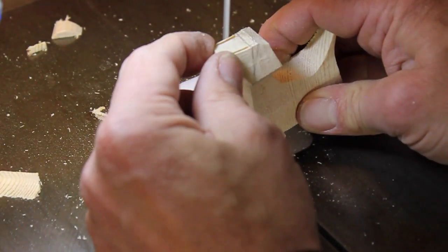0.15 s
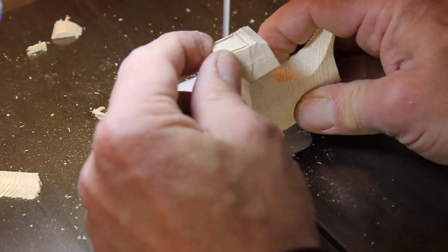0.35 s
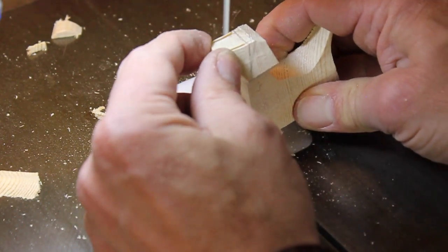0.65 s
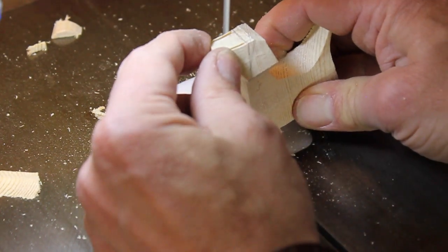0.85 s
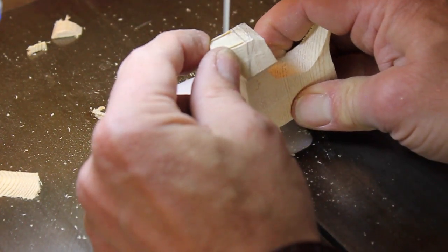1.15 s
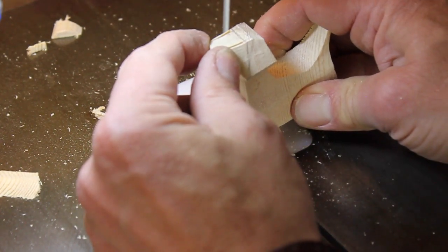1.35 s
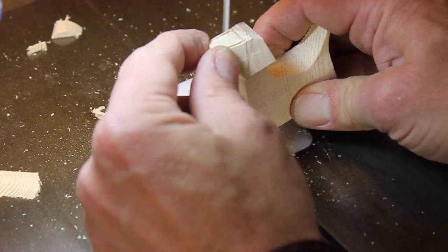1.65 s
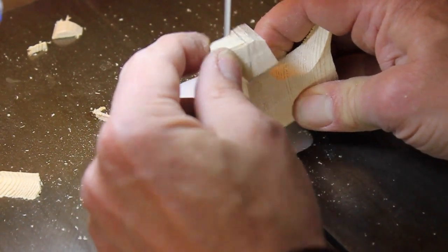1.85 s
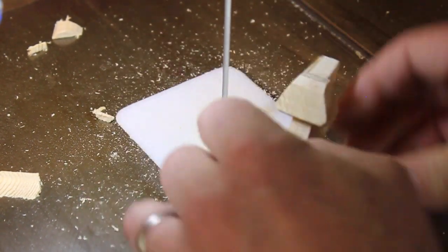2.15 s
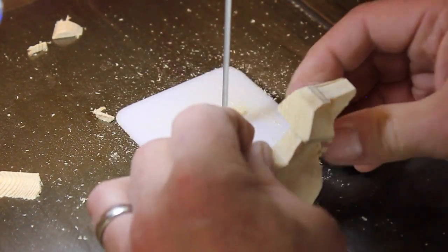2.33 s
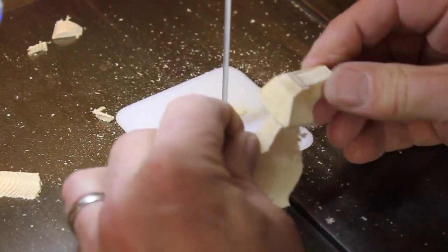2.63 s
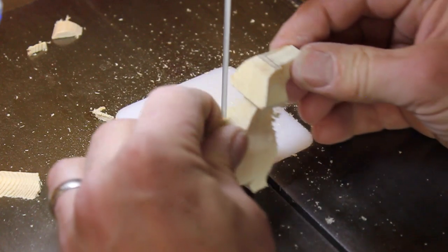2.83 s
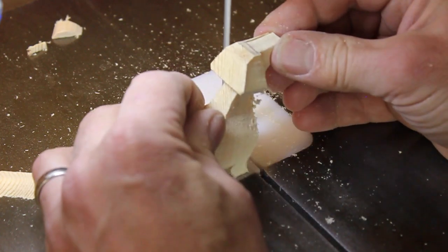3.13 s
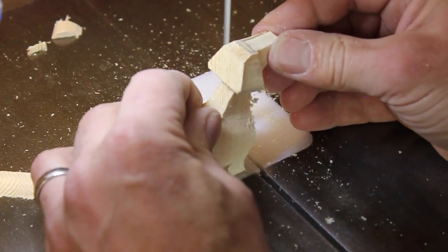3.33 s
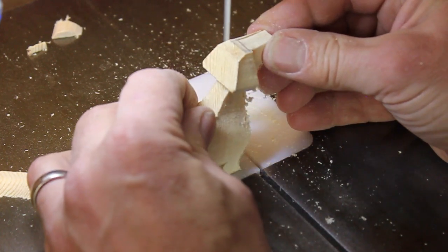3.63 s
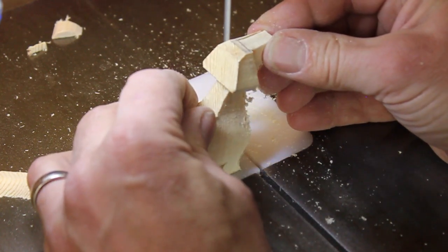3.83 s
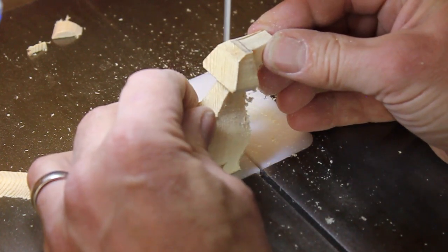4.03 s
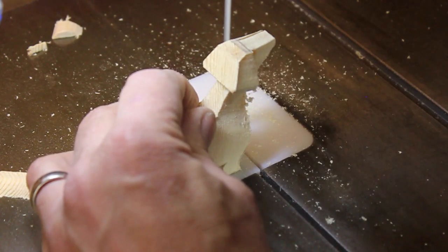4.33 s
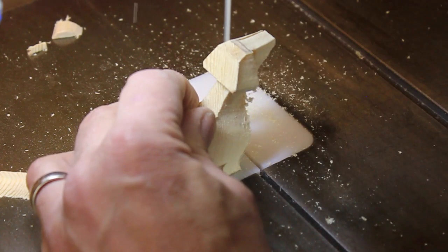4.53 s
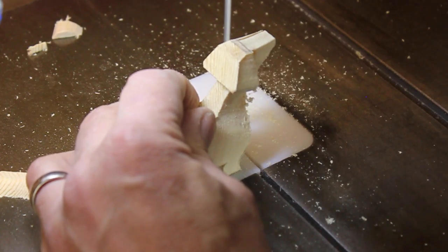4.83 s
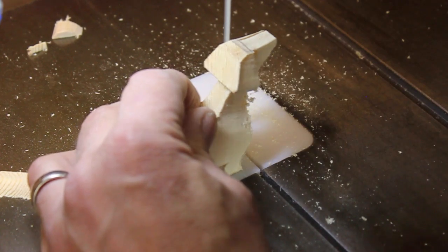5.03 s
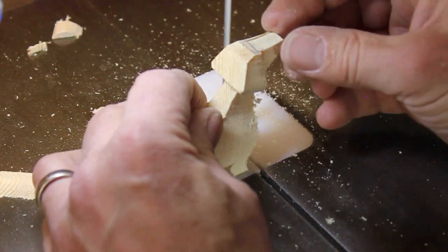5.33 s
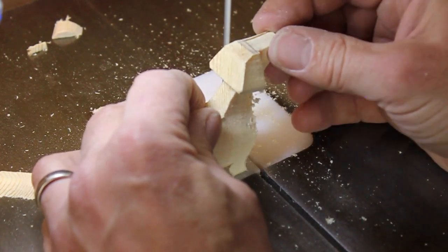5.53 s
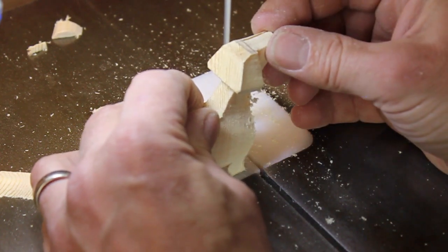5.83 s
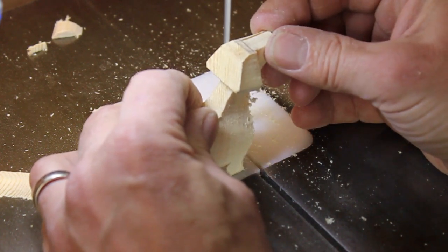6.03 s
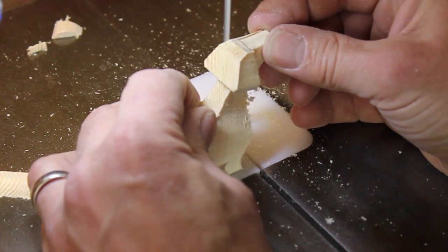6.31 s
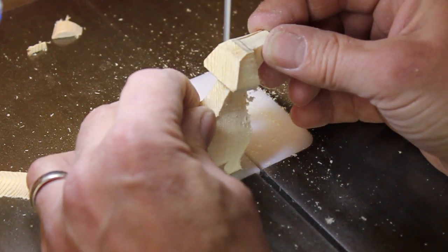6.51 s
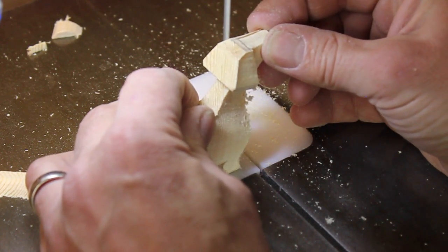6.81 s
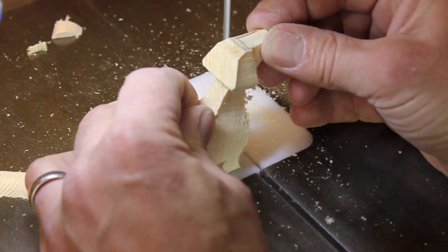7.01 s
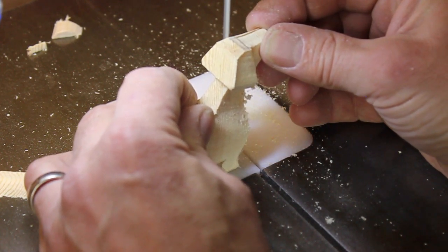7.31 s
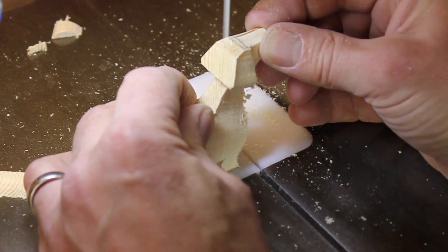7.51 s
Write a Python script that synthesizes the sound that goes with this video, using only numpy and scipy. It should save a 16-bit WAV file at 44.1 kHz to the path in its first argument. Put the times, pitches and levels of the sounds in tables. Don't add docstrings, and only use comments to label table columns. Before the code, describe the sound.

Steady bandsaw drone with harsh, throbbing blade hiss and a thin tooth whine; a small pop, then the same machine louder.

```python
import sys
import numpy as np
from scipy import signal
from scipy.fft import rfft, irfft
from scipy.io import wavfile
from scipy.ndimage import uniform_filter1d

SR = 44100
rng = np.random.default_rng(int(sys.argv[2]) if len(sys.argv) > 2 else 0)


def log_audio(samples):
    frames = np.atleast_2d(samples).T
    limited = np.clip(frames, -1, 1)
    pcm = np.round(limited * 32767).astype(np.int16)
    wavfile.write(sys.argv[1], SR, pcm)


def invert_db(level):
    return 10 ** (np.asarray(level, dtype=float) / 20)


N = 337806

CUT_S, SKIP_S = 2.2841, 0.0165
HUM_HZ, FAN_HZ = 100.16, 348.63
FAN_PER_PRESSURE, FAN_PER_LAP = 0.61, 0.37
LAP_HZ = 3.635
SING_S, SPEED_JITTER_HZ = 0.024, 3.5
BODY_PER_PRESSURE, SIZZLE_PER_PRESSURE = -0.27, -0.26
RUMBLE_HZ, RUMBLE_GRIP_DB = 380, -3.5
POP_DB, POP_S = -26, 0.0008

# fan level/dB, hum level/dB
MOTOR_DB = [
    (-27, -48),
    (-25, -46.5),
]
# f/Hz, swing/dB, lead/turns
SLIP_BEAT = [
    (1.1, 2.5, 0.56),
    (.56, 2.5, .59),
]
# f/Hz, level/dB
FIRST_ORDERS = [(471, -51.5), (702, -47.5)]
SECOND_ORDERS = [(50, -83), (149.5, -62.5), (400.6, -66), (451, -51.5), (500.6, -49), (701, -44.5),
                 (744, -58)]
# multiple of lap rate, swing/dB, lead/turns
LAP_THROB = [
    [(2, 0.77, 0.79), (4, 0.52, .36)],
    [(.5, 0.29, 0.47), (1, 0.77, 0.95), (2, 0.54, 0.81)],
]
# t/s, pressure level/dB, grip/0-1
CONTACT = [
    [(0, 0.4, 0.5), (.45, -0.3, 0.93), (1.0, 0.7, 0.7), (1.3, -1, 0.87), (1.7, 1, .8), (2.05, 0.5, 0.1),
     (2.28, 1, 0)],
    [(2.29, 0.3, 0), (2.6, 1, 0), (2.95, -.8, 0), (3.2, 0.8, 0), (4.3, -0.3, 0.1), (4.75, 0.3, 0),
     (5.05, -0.65, .05), (6.0, -0.2, 0), (6.5, 0.3, .1), (7.0, -1.2, 0.38), (7.66, -2.3, 0.8)],
]
# t/s, f/Hz
TOOTH_RATE = [
    (0, 870.5),
    (.5, 868.5),
    (1.7, 867.5),
    (2.0, 872),
    (2.4, 872.3),
    (6.9, 872),
    (7.66, 871),
]
# f/Hz, swing/Hz of tooth rate
RUNOUT = [
    [(10.6, 2.0), (21.3, 1.3), (14.5, .9)],
    [(5.34, 2.0), (8.27, 1.4), (10.7, 1.1)],
]
# multiple, level/dB, pressure share, full-grip change/dB, lap share
TOOTH_OVERTONES = [
    [(1, -32.5, 0.98, -1.5, 1.1), (2, -39.5, 0.61, 2.5, 1.1), (3, -29.5, 0.48, 1.3, 1.1),
     (4, -33.5, .8, -3.5, 1.1), (5, -37.5, .8, -2, 1.1), (6, -32.5, .8, -8, 1.1)],
    [(1, -32, 0.52, -2.5, 0.86), (2, -40.5, .8, 5.5, 2.3), (3, -28, 0.49, 5.5, 0.43),
     (4, -32.5, 0.73, 3.5, 0.81), (6, -35, .8, 2, 1.2)],
]
# t/s, overtones 1-2 level/dB, higher overtones level/dB
SINGS = [(.23, 2, 3), (.93, .5, -2), (1.22, 4, 4), (1.48, 3, .5), (1.8, 1, 1.5), (2.6, 3.5, 1.5),
         (2.82, -1, 5.5), (3.17, 0, 3.5), (3.37, -2, 6), (3.7, 2, 4), (3.92, 1.5, 4), (4.26, 3, -2),
         (4.47, -1, 6), (4.71, 1, 7.5), (4.8, 4, 4), (5.26, 4, 7), (5.81, -1, 6), (5.91, 2.5, 1),
         (6.18, 3.5, 6), (6.38, -4, 5), (6.73, -1, -2), (6.94, -1, 7), (7.27, -6, 3.5), (7.5, .5, 4.5)]
# f/Hz, level/dB
HISS_COLOUR = [
    [(25, -30), (185, -19.5), (203, -9.5), (420, -6), (720, -5.5), (1300, -6.5), (1900, -6.5), (2350, -3), (5700, -0.46), (6200, -4), (7050, -2), (7400, -5.5), (11300, -8), (15700, -11.5)],
    [(25, -24), (185, -16.5), (203, -3.5), (420, -0.5), (720, -6), (1300, -3.5), (1900, -4), (2350, 0.5), (5700, 3.5), (6200, -0.5), (7050, 0.5), (7400, -2), (11300, -6.5), (15700, -9.5)],
]
# f/Hz, width/Hz, first shot
# level/dB, second shot level/dB
PEAKS_AND_DIPS = [(480, 30, 4.2, 4.4), (940, 50, 3.2, 9.1), (1060, 90, 6.5, 2.8), (1510, 40, 7.6, 2.5),
                  (1650, 100, 8.8, 3.6), (2100, 60, 4.5, 8.4), (2230, 50, 6.4, 6.3), (2700, 300, 6.3, 6.2),
                  (2870, 40, 3.9, 5.0), (3425, 30, 5.0, 7.8), (3570, 50, 7.6, 5.4), (3820, 270, 1.2, 2.6),
                  (4260, 30, 5.8, 3.7), (4810, 90, 2.0, 3.7), (5880, 80, 4.0, 2.5), (5970, 40, 4.3, 5.6),
                  (6550, 290, 3.7, 4.1), (7070, 60, 5.1, 1.9), (7840, 90, 6.8, 3.2), (8180, 40, 6.2, 2.9),
                  (9690, 110, 5.1, 7.8), (9870, 50, 5.5, 4.7), (10800, 110, 7.5, 7.6), (12050, 300, 6.0, 6.5),
                  (12190, 50, 5.8, 0.8), (13040, 180, 6.2, 2.5), (13920, 140, 9.5, 8.9), (14350, 100, 6.5, 7.5),
                  (14510, 110, 6.2, 6.4), (15610, 100, 3.2, 3.3),
                  (1400, 60, -5, -4),
    (1900, 130, -3.5, -5),
    (7330, 100, -4, -3),
    (11300, 200, -1.5, -3),
]
# rub level/dB, then full-grip change/dB of rub, body, sizzle
RUB_DB = [
    (-26, -1.8, 6, 3.5),
    (-21.5, 0.9, 4, 2.5),
]
USUAL_GRIP = .7, .15
# t/s, low f/Hz, high f/Hz
SPLIT_BANDS = [(0.618, 14470, 15930), (0.732, 12320, 13870), (0.85, 4570, 6980), (0.859, 13090, 15850),
               (1.059, 5080, 6370), (1.128, 4570, 5770), (2.13, 14380, 15850), (2.154, 9650, 11110),
               (2.171, 6800, 8350), (2.523, 4570, 5770), (2.523, 11020, 12490), (3.127, 8180, 9730),
               (3.403, 14470, 15850), (3.752, 4130, 5250), (3.844, 9560, 13870), (4.262, 4130, 5250),
               (4.288, 8180, 9730), (4.381, 10250, 11800), (4.774, 9560, 11110), (4.889, 4130, 5250),
               (5.309, 11020, 12490), (6.389, 11630, 15850), (6.447, 8870, 10420), (6.448, 5600, 6980),
               (6.537, 12320, 13780), (6.632, 4130, 5250), (7.119, 8870, 10340), (7.119, 13700, 15930),
               (7.238, 6890, 8350), (7.605, 4570, 5770)]


def evened(x):
    return x / np.sqrt(np.mean(abs(x) ** 2) + 1e-20)


def columns(rows):
    s, *values = np.transpose(rows)
    return [np.interp(np.arange(N) / SR, s, v) for v in values]


def wander(hz):
    f = np.fft.fftfreq(N, 1 / SR)
    z = rng.standard_normal(N) + 1j * rng.standard_normal(N)
    return evened(np.fft.ifft(z / (1 + (f / hz) ** 2)))


def lap(shot):
    t = np.arange(N) / SR - CUT_S
    return sum(db * np.cos(2 * np.pi * (k * LAP_HZ * t + lead)) for k, db, lead in LAP_THROB[shot])


def motor(shot):
    t = np.arange(N) / SR - CUT_S + (shot - 0.5) * SKIP_S
    press_db, _ = columns(CONTACT[shot])
    fan_db, hum_db = MOTOR_DB[shot]
    fan_db = fan_db + FAN_PER_PRESSURE * press_db + FAN_PER_LAP * lap(shot)
    beat_hz, swing_db, lead = SLIP_BEAT[shot]
    hum_db = hum_db + swing_db * np.cos(2 * np.pi * (beat_hz * t + lead))

    unsteady = 1 + 0.07 * wander(14) + 0.06 * wander(5)
    out = -invert_db(fan_db) * (np.exp(2j * np.pi * FAN_HZ * t) * unsteady).real
    out += invert_db(hum_db) * np.cos(2 * np.pi * HUM_HZ * t)
    for hz, db in (FIRST_ORDERS, SECOND_ORDERS)[shot]:
        waver = evened(1 + 1.2 * wander(6))
        out += invert_db(db) * (np.exp(2j * np.pi * hz * t) * waver).real
    return np.sqrt(2) * out


def teeth(shot):
    t = np.arange(N) / SR
    press_db, grip = columns(CONTACT[shot])
    low_db, high_db = sum(np.outer(dbs, np.exp(-((t - s) / SING_S) ** 2)) for s, *dbs in SINGS)

    rate_hz = columns(TOOTH_RATE)[0] + SPEED_JITTER_HZ * wander(20).real
    for f, swing_hz in RUNOUT[shot]:
        rate_hz = rate_hz + swing_hz * np.sin(2 * np.pi * (f * t + rng.random()))
    turns = np.cumsum(rate_hz) / SR

    out = np.zeros(N)
    for k, db, push, grip_db, throb in TOOTH_OVERTONES[shot]:
        sing_db = low_db if k < 3 else high_db
        level_db = db + push * press_db + grip_db * grip + throb * lap(shot) + sing_db
        smear = evened(1 + (0.3 + 0.07 * k) * wander(22))
        out += np.sqrt(2) * invert_db(level_db) * (np.exp(2j * np.pi * k * turns) * smear).real
    return out


def hiss_colour_db(shot, hz):
    f, db = np.transpose(HISS_COLOUR[shot])
    colour_db = np.interp(np.log(hz + 1), np.log(f), db)
    for centre_hz, width_hz, *lifts_db in PEAKS_AND_DIPS:
        colour_db += lifts_db[shot] / (1 + (2 * (hz - centre_hz) / width_hz) ** 2)
    return colour_db + 1.8 * evened(uniform_filter1d(rng.standard_normal(len(hz)), 200))


def blade(shot):
    hz = np.fft.rfftfreq(N, 1 / SR)
    flicker_db = 0.8 * wander(220).real + 0.75 * wander(18).real
    drive = rng.standard_normal(N) * invert_db(flicker_db)
    spectrum = rfft(drive) * invert_db(hiss_colour_db(shot, hz))
    spectrum /= np.sqrt(np.mean(irfft(spectrum * (hz > 3700) * (hz < 7000), N) ** 2))

    press_db, grip = columns(CONTACT[shot])
    grip = grip - USUAL_GRIP[shot]
    rub_db, rub_grip_db, body_grip_db, sizzle_grip_db = RUB_DB[shot]
    rumble = 1 / (1 + (hz / RUMBLE_HZ) ** 6)
    low = 1 / (1 + (hz / 2600) ** 6)
    sizzle = 1 / (1 + (7200 / (hz + 1)) ** 8)
    parts = [(rumble, RUMBLE_GRIP_DB * (1 - shot) * grip),
             (low - rumble, body_grip_db * grip + BODY_PER_PRESSURE * press_db),
             (1 - low - sizzle, 0),
             (sizzle, sizzle_grip_db * grip + SIZZLE_PER_PRESSURE * press_db)]
    out = sum(invert_db(part_db) * irfft(spectrum * share, N) for share, part_db in parts)
    out *= invert_db(rub_db + press_db + rub_grip_db * grip + lap(shot))

    z = signal.stft(out, nperseg=512, noverlap=384)[2]
    patches = uniform_filter1d(rng.standard_normal(z.shape), 8, 0)
    patches = evened(uniform_filter1d(patches, 20, 1))
    return signal.istft(z * invert_db(0.74 * patches), nperseg=512, noverlap=384)[1][:N]


def split_image(x):
    hz, t, z = signal.stft(x, SR, nperseg=512, noverlap=384)
    share = np.zeros(z.shape[1:])
    for s, low_hz, high_hz in SPLIT_BANDS:
        in_band = (hz > low_hz) & (hz < high_hz)
        share += np.outer(in_band, np.clip((0.017 - abs(t - s)) / 0.006, 0, 1))
    share = np.minimum(share, 1)
    noise = signal.stft(rng.standard_normal(x.shape), SR, nperseg=512, noverlap=384)[2]
    power = uniform_filter1d(abs(z) ** 2, size=9, axis=1)
    level = np.sqrt(uniform_filter1d(power, size=13, axis=2))
    kept = np.sqrt(1 - share ** 2) * z * (hz < 15740)[:, None]
    z = kept + share * level * evened(noise)
    return signal.istft(z, SR, nperseg=512, noverlap=384)[1][:, :N]


def joint_pop():
    t = np.arange(N) / SR - CUT_S
    return -invert_db(POP_DB) * np.exp(-(t / POP_S) ** 2)


def scene():
    first, second = (motor(shot) + teeth(shot) + blade(shot) for shot in (0, 1))
    mono = np.where(np.arange(N) / SR < CUT_S, first, second) + joint_pop()
    return np.tile(mono, (2, 1))


def top_cut(x):
    return signal.sosfilt(signal.butter(12, 15810, fs=SR, output="sos"), x)


def record(dry):
    mix = split_image(dry)
    return top_cut(mix)


dry = scene()
out = record(dry)
log_audio(out)
```